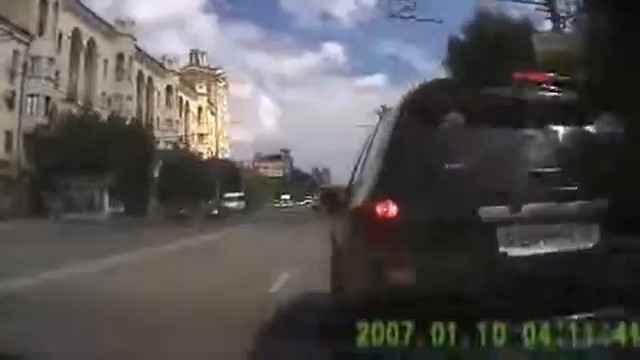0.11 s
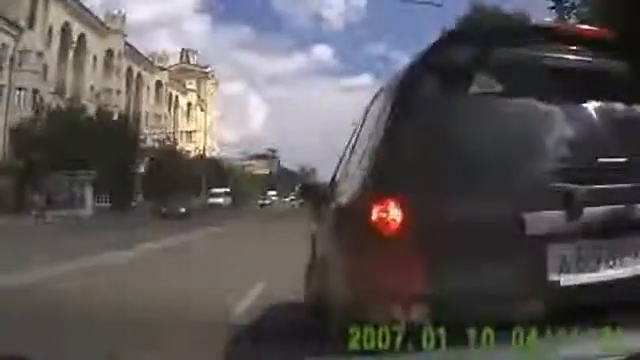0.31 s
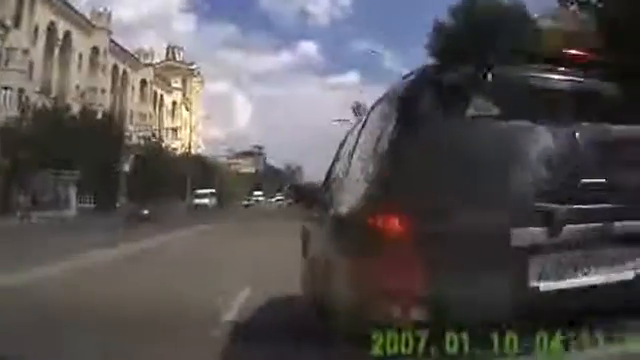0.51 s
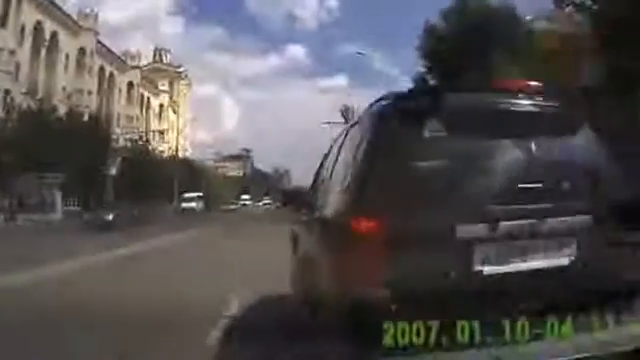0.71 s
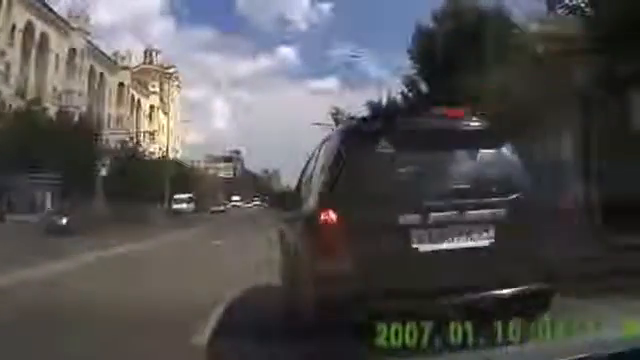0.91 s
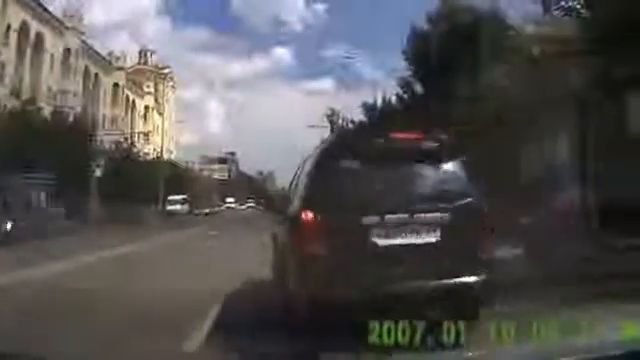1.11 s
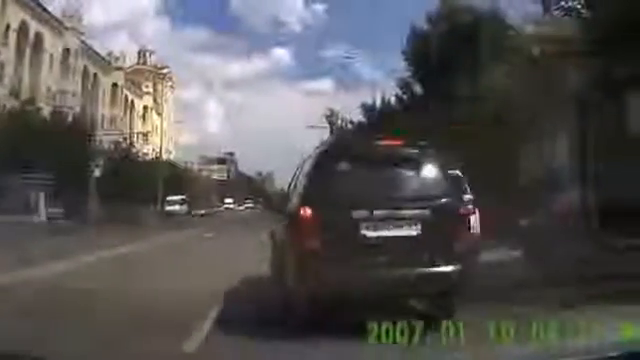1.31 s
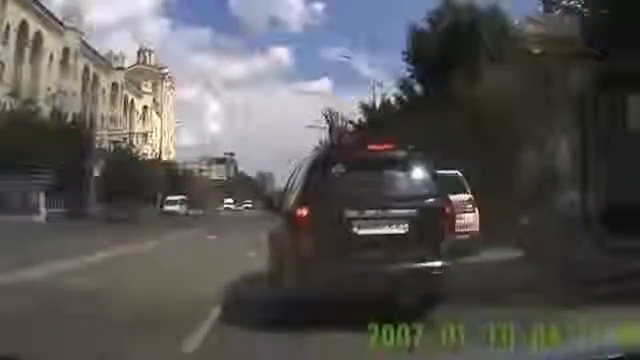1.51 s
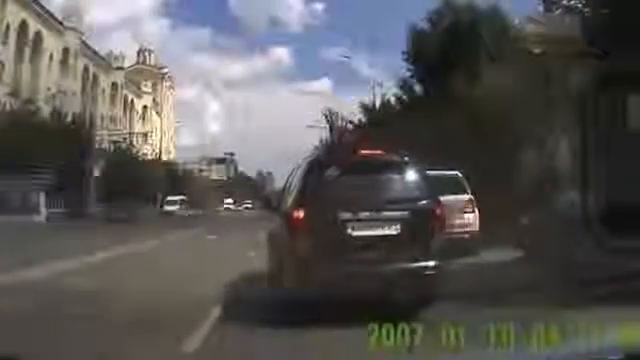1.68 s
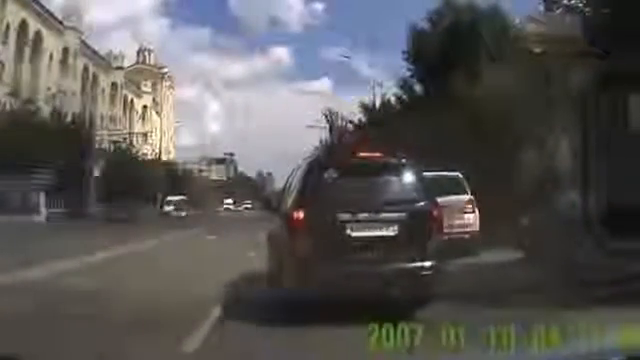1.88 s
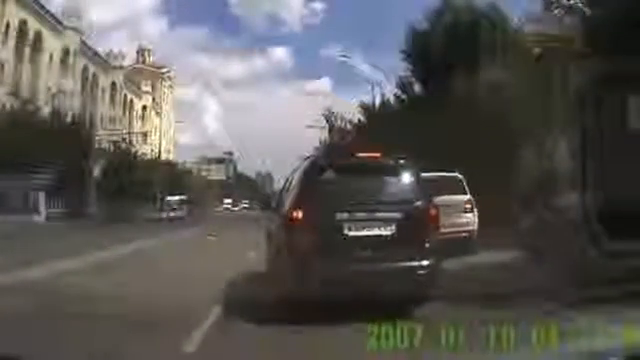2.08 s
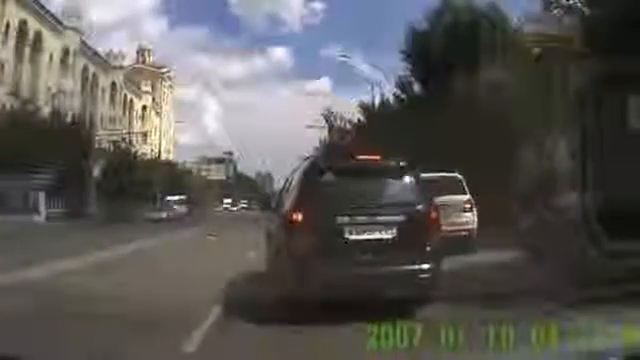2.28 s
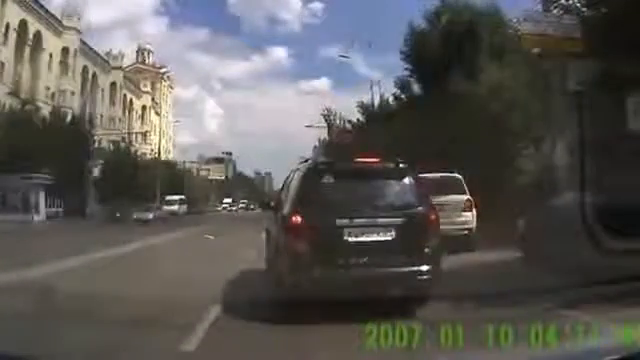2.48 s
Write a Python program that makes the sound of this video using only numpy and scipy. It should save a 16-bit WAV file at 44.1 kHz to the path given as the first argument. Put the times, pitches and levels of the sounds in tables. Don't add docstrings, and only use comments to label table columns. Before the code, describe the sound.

A car crash from inside the cabin. Faint road hiss and a small tick, then from 0.2 s sharp plastic snaps, body thuds and a tyre squeal. At about 0.45 s a loud crunch with ringing panels, cracking until 0.6 s as the squeal fades. Loose things clatter around 0.9-1.0, 1.3 and 1.45 s. Afterwards quiet hiss, faint idle hum, and a car passing softly near 2.2 s. Muffled microphone.

```python
import sys
import numpy as np
from scipy import signal
from scipy.io import wavfile

SR = 44100
rng = np.random.default_rng(int(sys.argv[2]) if len(sys.argv) > 2 else 0)


def undo_db(level):
    steps = np.asarray(level, float) / 20
    return 10 ** steps


def store_pcm(level_fs):
    pcm = np.round(np.clip(level_fs, -1, 1) * 32767).astype(np.int16)
    wavfile.write(sys.argv[1], SR, np.atleast_2d(pcm).T)


N = 114660


def in_time(rows):
    s, *columns = np.transpose(rows)
    return [np.interp(np.arange(N) / SR, s, c) for c in columns]


def rms_one(x):
    return x / np.sqrt(np.mean(np.abs(x) ** 2) + 1e-20)


def drift(rate_hz):
    r = np.exp(-2 * np.pi * rate_hz / SR)
    settled = signal.lfilter([1], [1, -2 * r, r * r], rng.standard_normal(N + SR))[SR:]
    return rms_one(settled)


def ring(clicks, hz, t60):
    r = undo_db(-60 / (t60 * SR))
    w = 2 * np.pi * hz / SR
    return signal.lfilter([0, np.sin(w)], [1, -2 * r * np.cos(w), r * r], clicks + 1e-18)


def grains(per_s, spread_db):
    size = undo_db(spread_db * np.minimum(rng.exponential(1, N), 4.0)) * rng.choice([-1, 1], N)
    return rms_one(size * (rng.random(N) < per_s / SR))


def body(clicks, modes):
    out = 0
    for k, (hz, db, t60) in enumerate(modes):
        sign = (-1) ** k
        out = out + sign * undo_db(db) * ring(clicks, hz, t60) / np.sqrt(t60 * SR)
    return out


def hiss(spectrum, patchy_db):
    together = drift(3)
    edges = 40 * 2 ** np.arange(0, 7.6, .5)
    white = rng.standard_normal((2, N))
    hz, db = np.transpose(spectrum)
    out = 0
    for k, (low, high) in enumerate(zip(edges, edges[1:])):
        bandpass = signal.butter(2, [low, high], "band", fs=SR, output="sos")
        band = signal.sosfilt(bandpass, white[k % 2])
        level_db = np.interp(np.log(low * high) / 2, np.log(hz), db)
        flicker_db = patchy_db * (0.6 * together + drift(12.0))
        out = out + band * undo_db(level_db + flicker_db)
    return rms_one(out)


def wavering(hz, wobble_hz, steady):
    pointer = steady + drift(wobble_hz) + 1j * drift(wobble_hz)
    return rms_one(pointer * np.exp(2j * np.pi * np.cumsum(hz) / SR))


# t/s, f/Hz, level/dB
TYRE_SQUEAL = [(.2, 1670, -54), (.235, 1671, -32.5), (.285, 1590, -8.5), (.34, 1520, -12.5),
               (.42, 1570, -10.5), (.47, 1500, -12.5), (.545, 1680, -12), (.62, 1538, -19),
               (.72, 1626, -24.5), (.86, 1630, -33.5), (1.0, 1663, -57), (1.4, 1670, -58),
               (1.46, 1669, -30), (1.56, 1670, -40.5), (1.66, 1660, -48.5), (1.76, 1660, -43),
               (1.84, 1614, -50), (1.9, 1660, -55)]
# t/s, level/dB, f/Hz
TYRE_SLIPS = [(0.27, -13, 1620), (0.278, -14, 1630), (0.286, -6, 1590), (0.304, -7, 1590),
              (0.318, -13, 1580), (0.339, -12, 1530), (0.367, -8, 1550), (0.38, -10, 1640),
              (0.391, -10, 1570), (0.399, -9, 1550), (0.411, -10, 1600), (0.429, -10, 1580),
              (0.441, -11, 1530), (0.461, -7, 1530), (0.483, -11, 1590), (0.504, -12, 1540),
              (0.521, -15, 1550), (0.536, -13, 1620), (0.545, -9, 1700), (0.561, -13, 1610),
              (0.569, -16, 1720), (0.578, -14, 1630), (0.588, -18, 1580), (0.599, -17, 1550),
              (0.619, -18, 1650), (0.635, -18, 1560), (0.65, -20, 1620), (0.667, -19, 1650),
              (0.695, -19, 1650), (0.726, -23, 1620), (0.737, -23, 1630), (0.751, -25, 1570),
              (0.777, -27, 1670), (0.836, -31, 1630), (0.863, -30, 1610)]


def squeal():
    skirt_db, other_tyre_db, octave_db = -12.5, -11, -17
    t = np.arange(N) / SR
    hz, db = in_time(TYRE_SQUEAL)
    s, slip_db, slip_hz = np.transpose(TYRE_SLIPS)
    late = t > 1.2
    jitter = 1 + .006 * drift(28.7)

    between = np.sin(np.pi * np.interp(t, s, np.arange(len(s)))) ** 2
    bursts_db = np.interp(t, s, slip_db) - 4 - 9 * between
    tone_db = np.where((t > s[0]) & (t < s[-1]), bursts_db, db)
    tone_hz = np.where(late, hz, np.interp(t, s, slip_hz))
    tone = wavering(tone_hz * jitter, wobble_hz=55.4, steady=5)

    other_tyre = ~late * wavering(1505 * jitter, 40, 0.45)
    skirt = tone * drift(200) + undo_db(other_tyre_db - skirt_db) * other_tyre

    octave = wavering(2 * hz * jitter * 1.02, 220, 0.15 + 0.76 * late)
    octave = octave * undo_db(0.03 * (db.max() - np.maximum(db, -45)))

    mix = undo_db(tone_db) * tone
    mix = mix + undo_db(db + skirt_db) * skirt
    mix = mix + undo_db(db + octave_db + 2.0 * late) * octave
    return np.sqrt(2) * np.real(mix)


# t/s, level/dB
CRUMPLE_FORCE = [(.13, -47), (.157, -33.5), (.2, -43), (.23, -27.5), (.4, -44.5), (.43, -32), (.45, -8),
                 (.488, -8), (.512, -12.5), (.57, -19.5), (.68, -28.5), (.85, -42), (.95, -34),
                 (1.08, -41.5), (1.4, -43.5), (1.46, -30.5), (1.56, -54.5)]
# f/Hz, level/dB, t60/s
PANEL_MODES = [(97.2, -2.5, 0.036), (147.7, 0, 0.12), (225, -4.5, 0.044), (263, -3, 0.056),
               (330, -5.5, 0.027), (390, -4.5, 0.096), (500, -9.5, 0.0082)]
# f/Hz, level/dB, t60/s
SKIN_MODES = [(540, -5.5, 0.027), (648, -2.5, 0.051), (700, -2.5, 0.06), (897, -5, 0.058), (990, -5, 0.063),
              (1260, -4.5, 0.0096), (1900, -2, 0.012), (2190, -4.5, 0.005), (2750, -5.5, 0.0091)]


def crumple():
    folds_per_s, spread_db = 900, 4.04
    db, = in_time(CRUMPLE_FORCE)
    low = rms_one(body(grains(folds_per_s, spread_db), PANEL_MODES))
    bright = rms_one(body(grains(folds_per_s, spread_db), SKIN_MODES))
    bright_db = db.max() - 6.5 + 1.38 * (db - db.max())
    return undo_db(db) * low + undo_db(bright_db) * bright


# t/s, level/dB, f/Hz, t60/s
PANEL_BLOWS = [(0.151, -15, 143.4, 0.075), (.443, -11, 2980, 0.0077), (0.4471, -14, 405, 0.043),
               (0.4521, -1, 421, 0.051), (.4585, -3, 638, 0.043), (0.4616, -4, 377, 0.045),
               (.4675, -27, 2750, 0.0086), (.4695, -16, 163, .08), (.478, -11, 540, 0.064),
               (.479, -10, 130, 0.1), (.487, -4.5, 783, 0.035), (.4912, -10.5, 2500, 0.0069),
               (.498, -10, 667, .04), (0.501, -9, 250, 0.047), (.521, -16, 390, 0.072),
               (0.55, -12, 147.2, 0.11), (0.595, -16, 390, 0.094), (.775, -22, 455, 0.034),
               (0.851, -25.5, 100.6, 0.27), (.864, -24.5, 276, 0.071), (0.879, -22.5, 147.3, 0.091),
               (.895, -10, 654, 0.015), (0.933, -24, 2880, 0.035), (.985, -23, 600, 0.044),
               (1.111, -44.5, 2850, 0.025), (1.127, -34.5, 3030, .02), (1.141, -32, 2840, 0.036),
               (1.163, -24, 2770, 0.016), (1.181, -36, 1370, 0.033), (1.195, -30, 1310, 0.025),
               (1.207, -29, 1300, .03), (1.232, -30.5, 2040, 0.023), (1.268, -28, 253, 0.034),
               (1.308, -24.5, 1900, .05), (1.393, -36, 3230, 0.042), (1.426, -20, 140, 0.072),
               (1.48, -29, 100, 0.13)]


def blows():
    out = np.zeros(N + SR)
    t = np.arange(SR // 4) / SR
    for s, db, hz, t60 in PANEL_BLOWS:
        i = int(s * SR)
        rise = 1 - np.exp(-t * hz / 0.66)
        decay = undo_db(db + 3.5 - 60 * t / t60)
        out[i:i + len(t)] += rise * decay * np.sin(2 * np.pi * hz * t)
    return out[:N]


# t/s, level/dB, f/Hz
PLASTIC_SNAPS = [(0.029, -31.5, 3220), (0.1478, -24.5, 1960), (0.161, -15.5, 1700), (0.187, -30.5, 1966),
                 (0.2115, -3, 2180), (0.2378, -4.5, 1890), (0.2464, -8.5, 1820), (0.2584, -12.5, 2030),
                 (0.3246, -4, 2140), (0.5427, -13, 1800), (0.558, -3.5, 1916), (0.5693, -3, 2075),
                 (0.5758, -3, 1783), (0.6093, -3.5, 1814), (0.7606, -9, 2800), (0.9485, -10, 2000)]


def snaps():
    t60 = .008
    out = np.zeros(N)
    for s, db, hz in PLASTIC_SNAPS:
        click = np.zeros(2000)
        click[0] = undo_db(db - 1.0)
        snap = ring(click, hz, t60)
        snap = snap - 0.56 * ring(click, hz * 0.58, t60)
        snap = snap + 0.53 * ring(click, min(hz * 1.607, 3900), t60 / 2)
        i = int(s * SR)
        out[i:i + len(snap)] += snap
    return out


# t/s, level/dB
SHELL_SHUDDER = [(0.0, -30.5), (0.12, -33.5), (0.2, -23.5), (0.22, -14), (0.29, -22), (0.37, -16.5),
                 (0.46, -28.5), (0.51, -12), (0.57, -11), (0.59, -20), (0.88, -40), (1.0, -32), (1.19, -51),
                 (1.5, -37.5), (1.52, -49), (2.6, -48)]


def shudder():
    db, = in_time(SHELL_SHUDDER)
    rumble_band = signal.butter(2, [18, 91], "band", fs=SR, output="sos")
    rumble = rms_one(signal.sosfilt(rumble_band, rng.standard_normal(N)))
    shell_hz = 43.82 * (1 + 0.047 * drift(5.1))
    boom = np.sqrt(2) * np.real(wavering(shell_hz, wobble_hz=11, steady=1.4))
    return undo_db(db) * (boom + undo_db(-4) * rumble)


# t/s, level/dB, f/Hz, t60/s, own tone level/dB
LOOSE_KNOCKS = [(.445, -8, 399, 0.11, 8.5), (.797, -32, 1830, 0.082, 21), (.894, -10, 1400, 0.05, 7),
                (0.92, -12, 1500, 0.053, -6), (0.933, -19, 2070, 0.037, -2), (0.953, -9, 330, 0.07, 1.5),
                (0.949, -13, 1030, 0.087, 4.5), (0.983, -15.5, 2070, 0.028, 6), (1.01, -15, 1026, 0.094, 4),
                (1.021, -12, 1340, 0.047, -15), (1.3075, -8.5, 620, 0.078, -1.5),
                (1.411, -23, 567, .06, 0.5), (1.43, -23, 390, 0.047, 5.5), (1.442, -19, 1900, 0.045, 4),
                (1.451, -15.5, 1030, 0.079, 1.5), (1.51, -22, 1863, 0.11, 9), (1.535, -25.5, 2090, 0.16, 2),
                (1.604, -29, 1933, 0.15, 5), (2.03, -36.5, 698, 0.092, 17), (2.054, -44, 1000, 0.062, 23),
                (2.178, -31, 990, 0.054, 11)]
# f/Hz, level/dB, t60/s
TRIM_MODES = [(330, -11, 0.027), (620, -2.5, 0.0092), (836, -7.5, 0.0062), (1030, -5.5, 0.022),
              (1338, -4, 0.024), (1660, -5, 0.0097), (2070, -5.5, .015), (2348, -8, 0.0092),
              (2850, -8.5, 0.0068), (3610, -9.5, 0.0032), (4440, -17.5, 0.0022)]


def knocks():
    out = np.zeros(N + SR)
    t = np.arange(SR // 4) / SR
    chatter = grains(per_s=5000, spread_db=1.7)
    colour_db = rng.normal(0, 4.8, (len(LOOSE_KNOCKS), len(TRIM_MODES)))
    for (s, db, hz, t60, own_db), tint in zip(LOOSE_KNOCKS, colour_db):
        i = int(s * SR)
        envelope = undo_db(-60 * t / t60) * (1 - np.exp(-t / 0.0036))
        push = np.resize(chatter[i:], len(t)) * envelope
        push[0] += 7.0
        modes = [(f, d + c, r) for (f, d, r), c in zip(TRIM_MODES, tint)]
        modes.append((hz, own_db, t60 / 2))
        out[i:i + len(t)] += undo_db(db - 15.5 + 21.5) * body(push, modes)
    return out[:N]


# start t/s, length t/s, level/dB
LOOSE_SLIDES = [
    (0.138, 0.073, -37),
    (0.196, 0.086, -25.5),
    (0.246, 0.21, -27.5),
    (0.442, 0.097, -21),
    (0.539, 0.093, -29),
    (0.602, 0.46, -43.5),
    (0.87, 0.153, -31.5),
    (1.139, 0.12, -36),
    (1.347, 0.277, -45),
]


def slides():
    t = np.arange(N) / SR
    gate = 0
    for s, length, db in LOOSE_SLIDES:
        fade = np.minimum((t - s) / 0.023, (s + length - t) / 0.039)
        gate = gate + undo_db(db) * np.clip(fade, 0, 1)
    damped = [(hz, db + 5.0 * np.log2(hz / 1000), t60 * 0.44) for hz, db, t60 in TRIM_MODES]
    scratches = rms_one(body(grains(per_s=7500, spread_db=4.5), damped))
    return gate * undo_db(3.4 * drift(32)) * scratches


# f/Hz, level/dB (per Hz)
ROAD_SPECTRUM = [(35, -31), (60, -8.5), (188, -9.5), (296, -11), (442, -14), (1360, -9), (1520, -12.5),
                 (1690, -13), (4590, -43), (5970, -99), (10100, -120)]
# f/Hz, level/dB (per Hz)
PASSING_SPECTRUM = [(240, -52.5), (400, 2), (1220, 10.5), (1850, -22.5), (2010, -27), (3900, -10),
                    (4590, -24), (5970, -82), (10100, -120)]
# f/Hz, level/dB, t60/s
WHINE_MODES = [(1024, 0, 0.12), (1213, -1, 0.31), (1305, 0, 0.06), (1398, -5, 0.14), (2027, -9.5, 0.13),
               (2670, -12, 0.013), (3840, -14, 0.0091)]


def street():
    t = np.arange(N) / SR
    dip = np.exp(-((t - 1.18) / 0.15) ** 2)
    road_db = -39 - 0.5 * (t < .6) - 2.5 * dip
    road = undo_db(road_db) * hiss(ROAD_SPECTRUM, patchy_db=1.5)

    idle = np.real(wavering(np.full(N, 294.4), wobble_hz=1.1, steady=1.4))
    hum = undo_db(-45) * np.clip((t - 1.5) / 0.11, 0, 1) * idle

    near = 1 / (1 + ((t - 2.242) / 0.26) ** 2)
    whine = rms_one(body(grains(per_s=4200, spread_db=4.9), WHINE_MODES))
    roar = hiss(PASSING_SPECTRUM, patchy_db=1.1) + undo_db(1) * whine
    return road + hum + undo_db(-38) * near * roar


def scene():
    car = squeal() + crumple() + blows() + snaps() + shudder()
    cabin = knocks() + slides()
    return (car + cabin + street())[None]


def roll_off(x):
    return signal.sosfilt(signal.butter(12, 15570, fs=SR, output="sos"), x)


def record(dry):
    squash, ceiling, knee = 2.0, .98, 16
    mic = signal.butter(2, 3830, fs=SR, output="sos")
    top_cut = signal.cheby2(12, 70, 4206 * 1.326, fs=SR, output="sos")
    x = signal.sosfilt(mic, squash * np.tanh(dry / squash))
    x = signal.sosfilt(top_cut, x)
    x = x / (1 + np.abs(x / ceiling) ** knee) ** (1 / knee)
    x = x + undo_db(-95) * rng.standard_normal(x.shape)
    return roll_off(x)


dry = scene()
out = record(dry)
store_pcm(out)
```